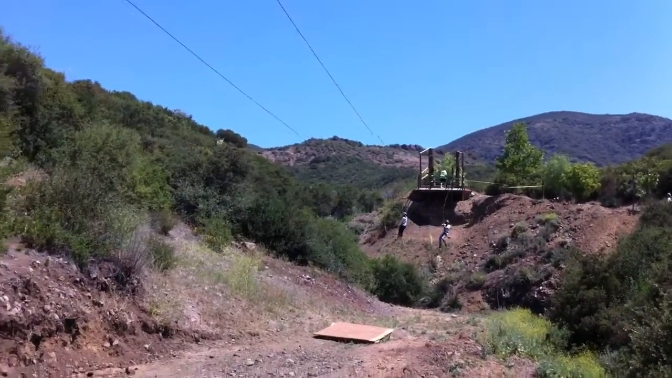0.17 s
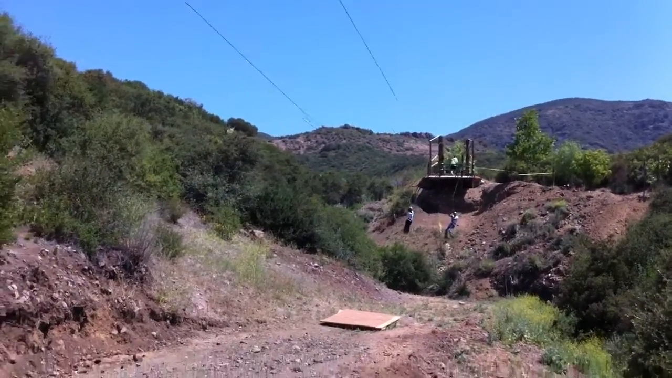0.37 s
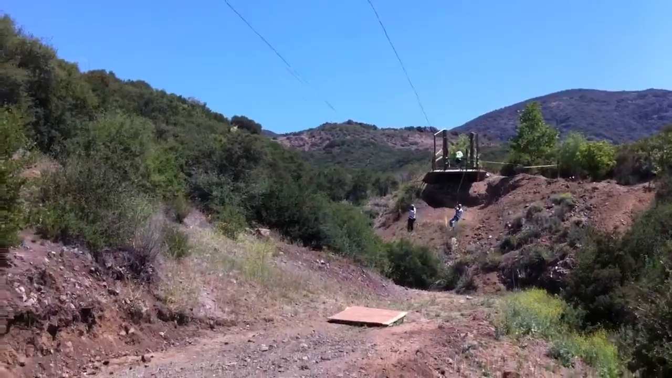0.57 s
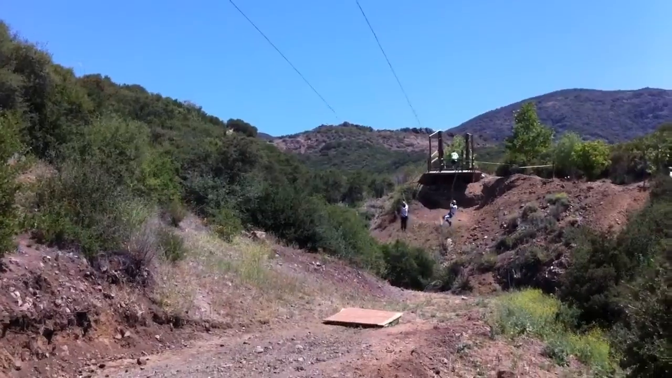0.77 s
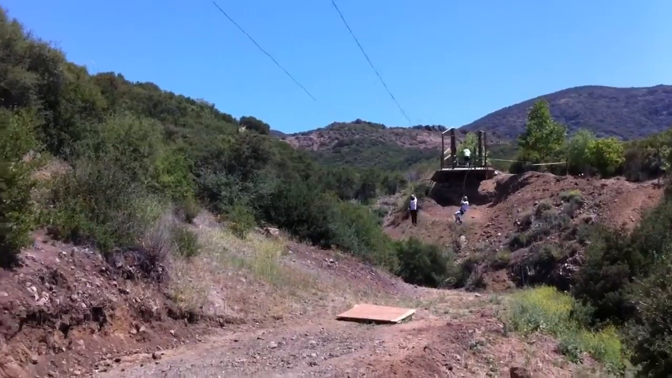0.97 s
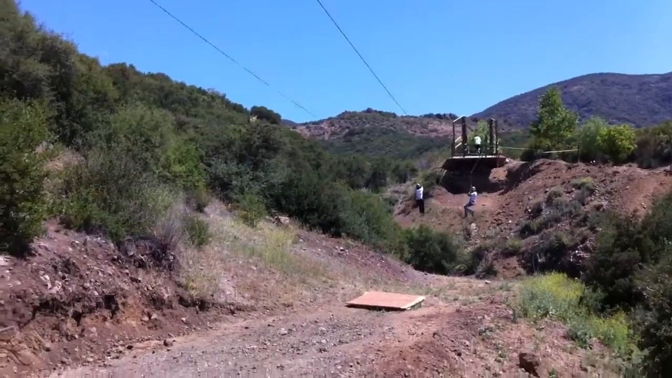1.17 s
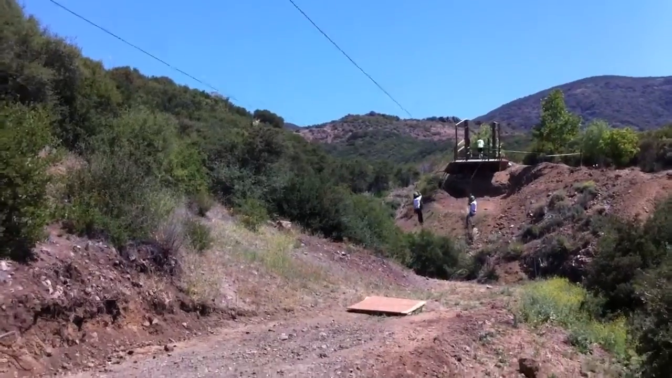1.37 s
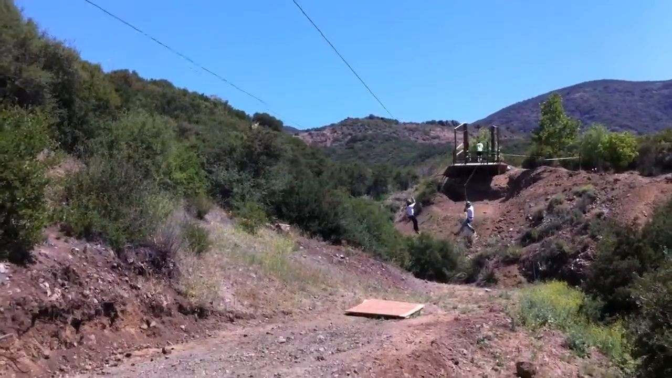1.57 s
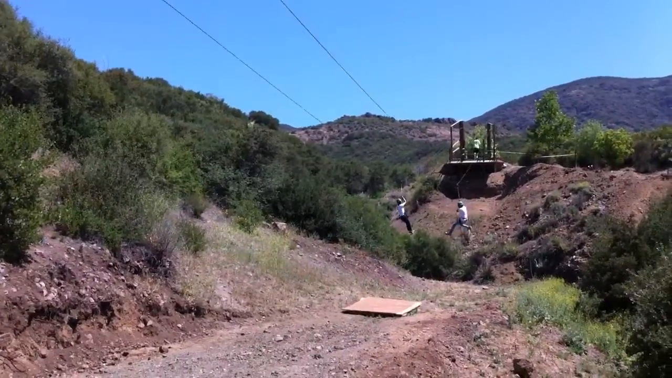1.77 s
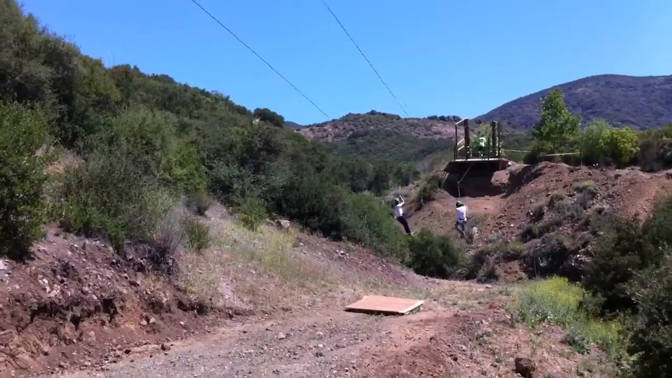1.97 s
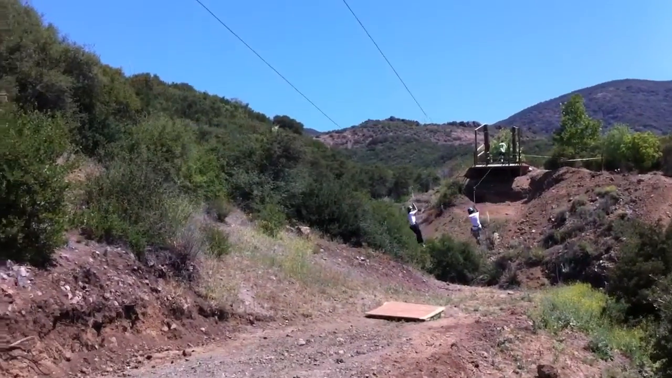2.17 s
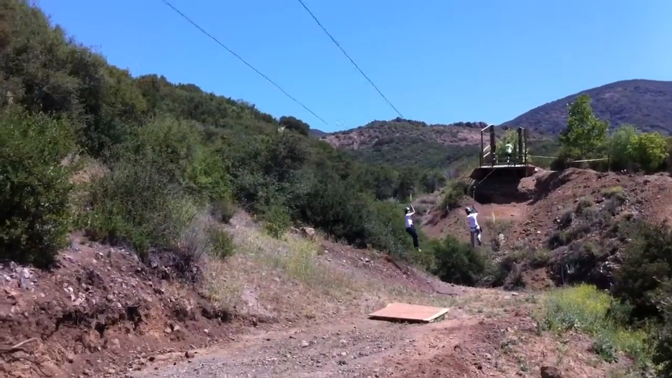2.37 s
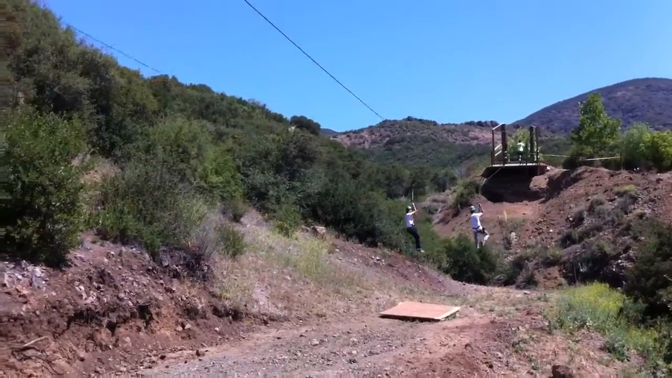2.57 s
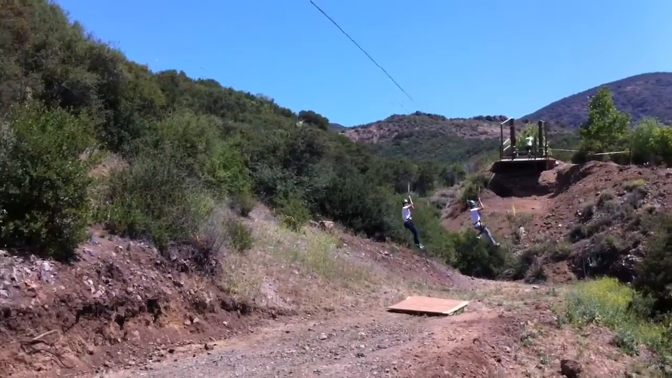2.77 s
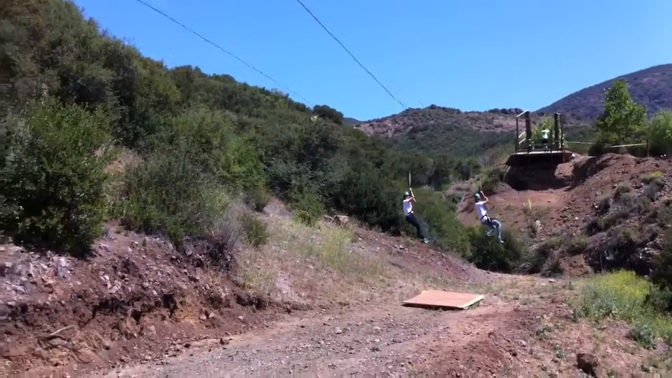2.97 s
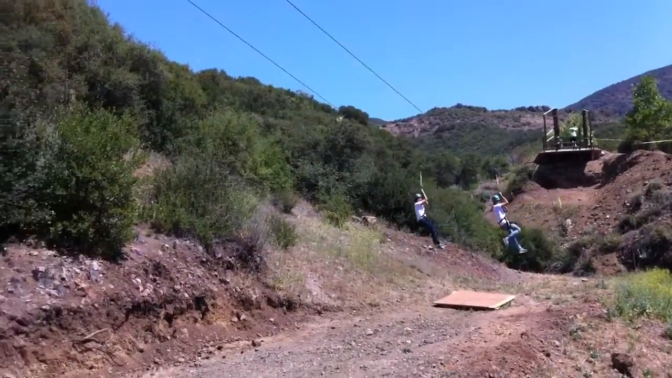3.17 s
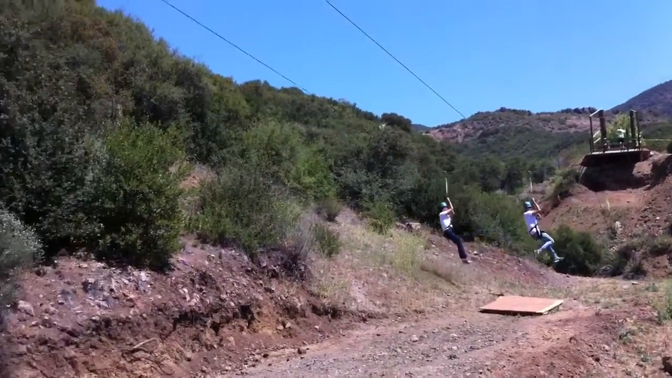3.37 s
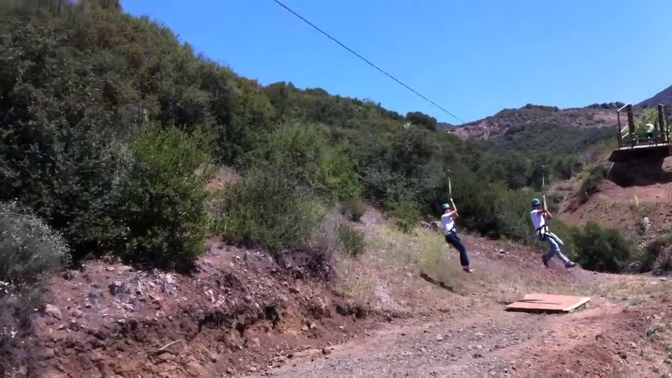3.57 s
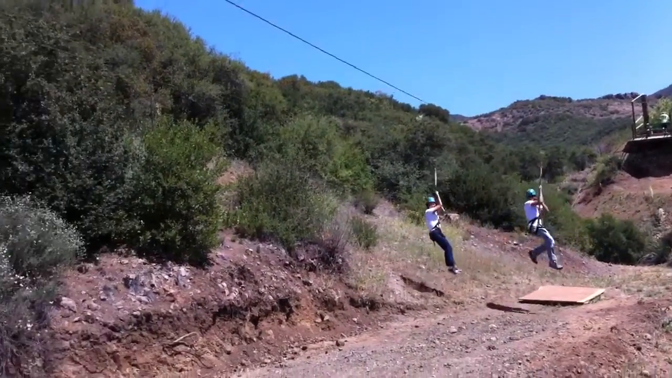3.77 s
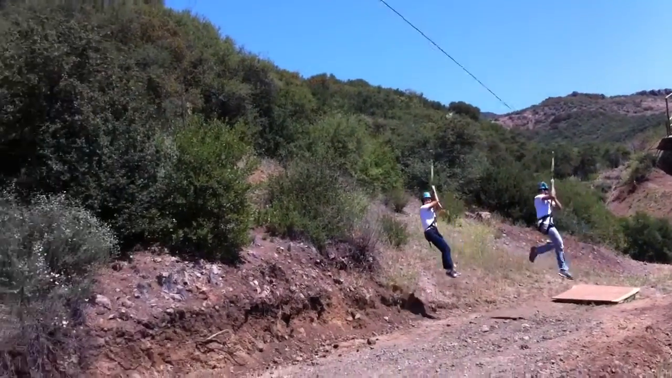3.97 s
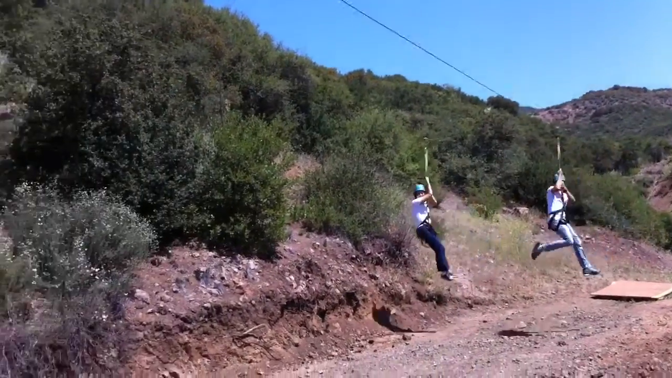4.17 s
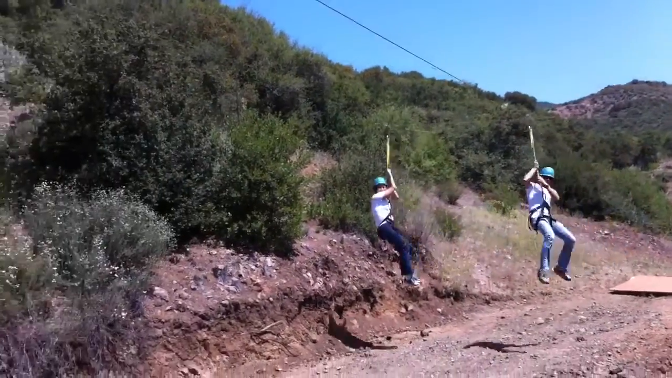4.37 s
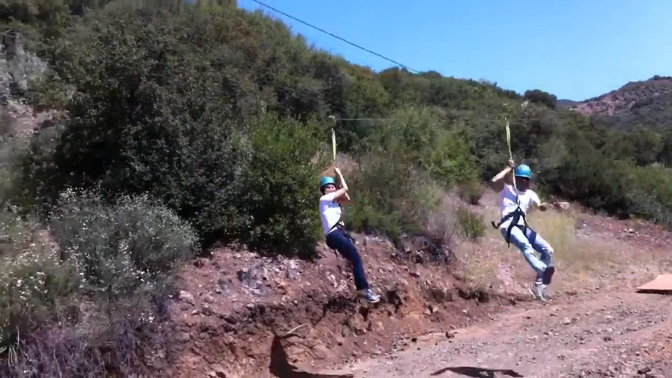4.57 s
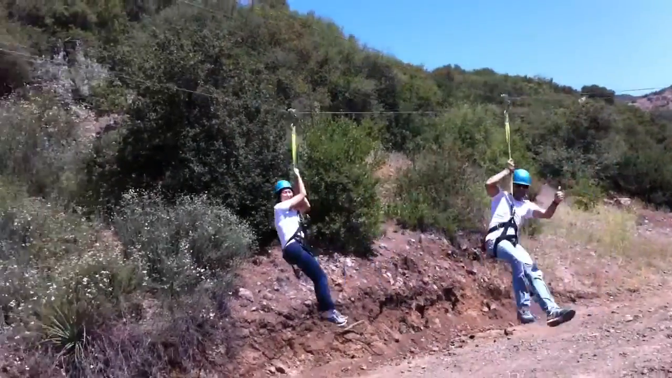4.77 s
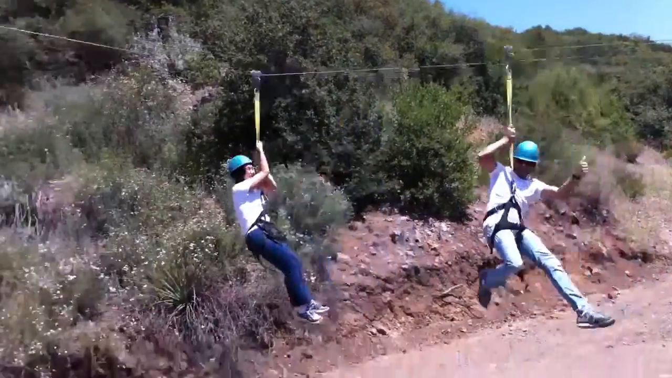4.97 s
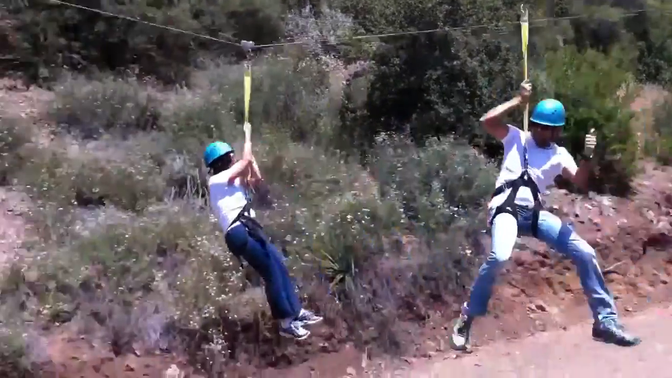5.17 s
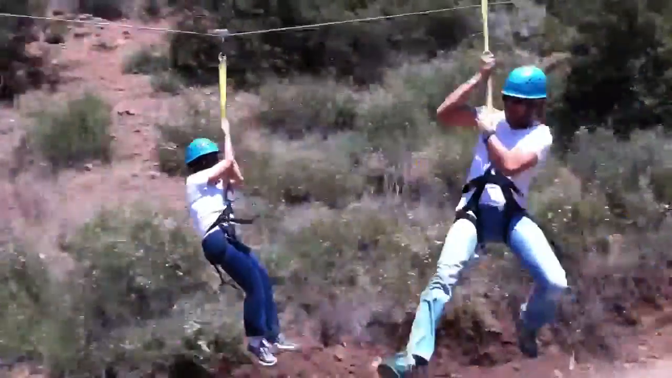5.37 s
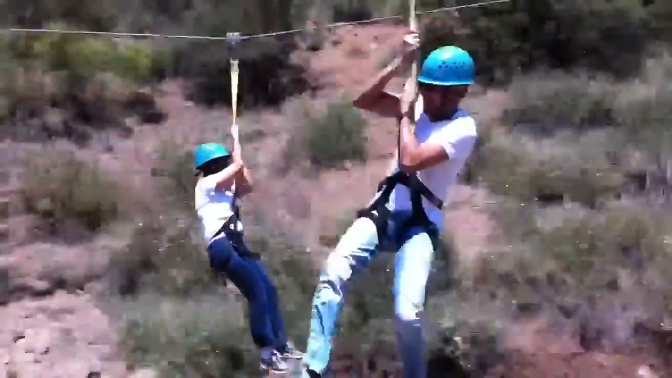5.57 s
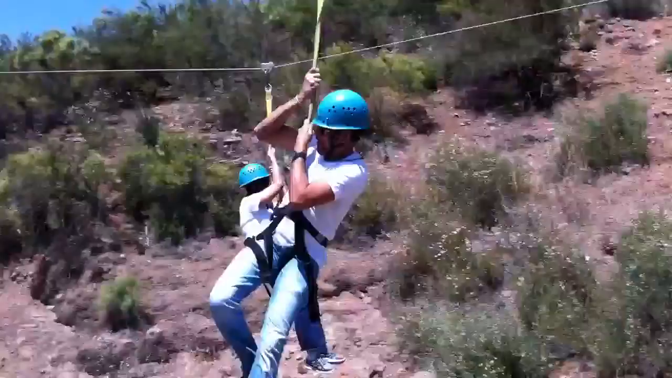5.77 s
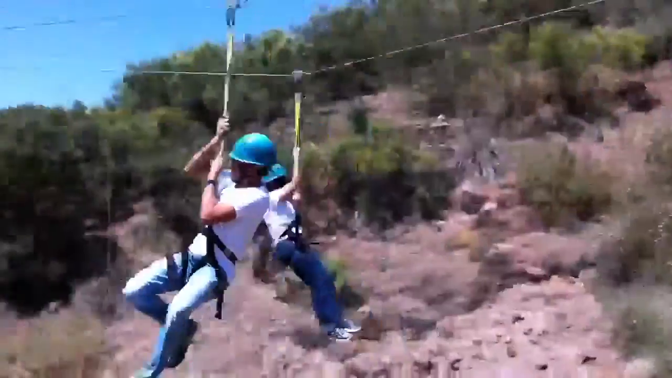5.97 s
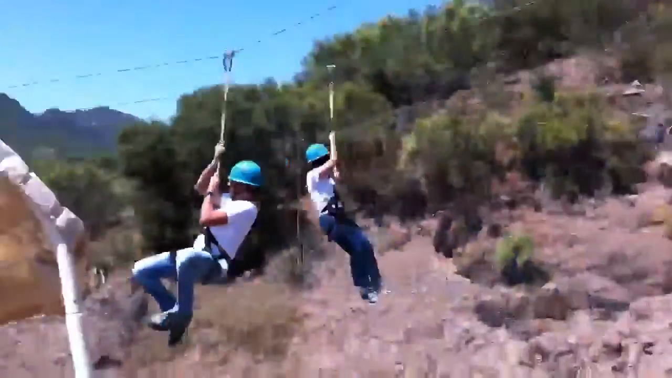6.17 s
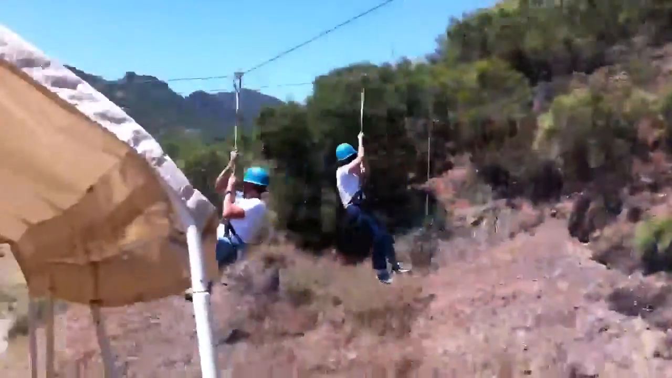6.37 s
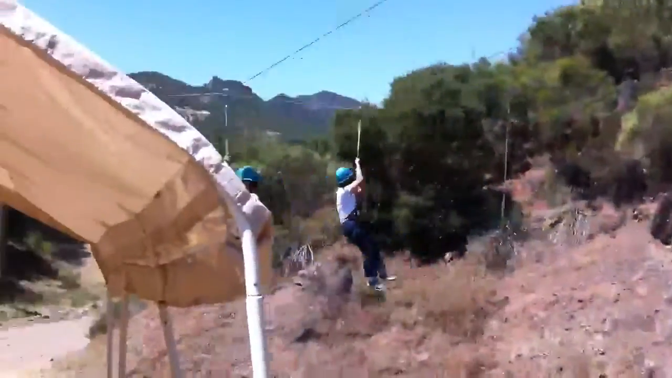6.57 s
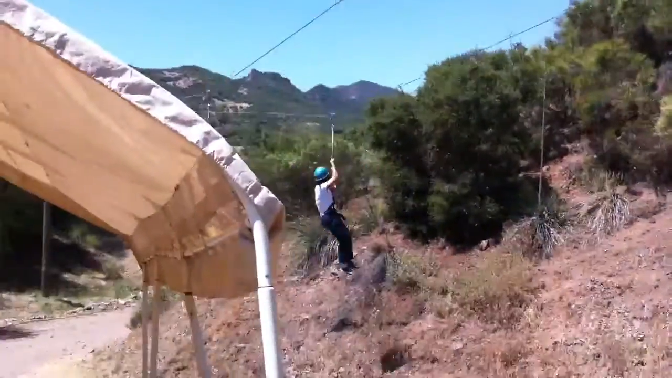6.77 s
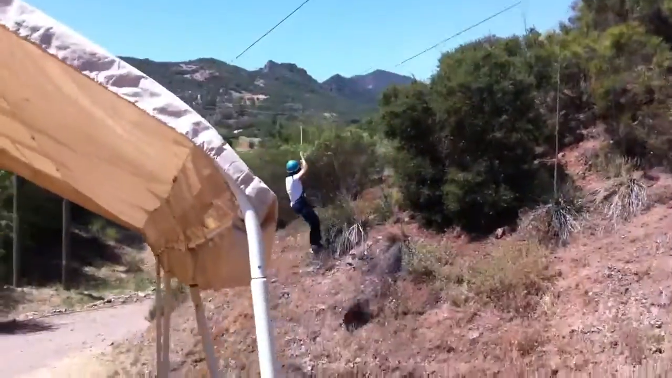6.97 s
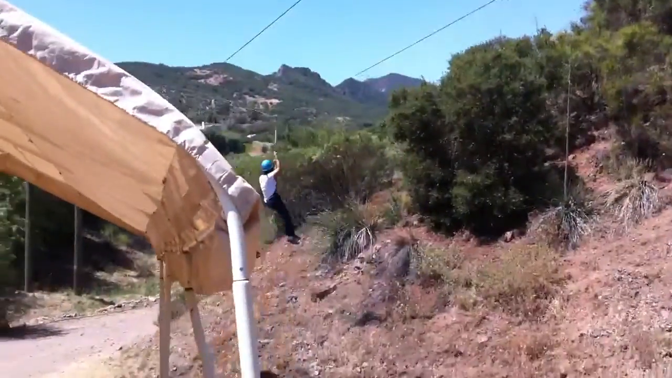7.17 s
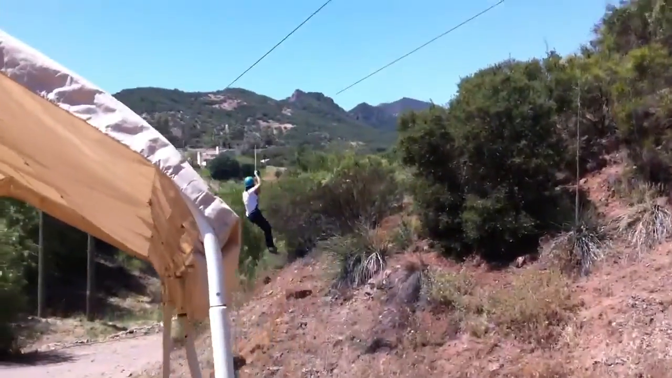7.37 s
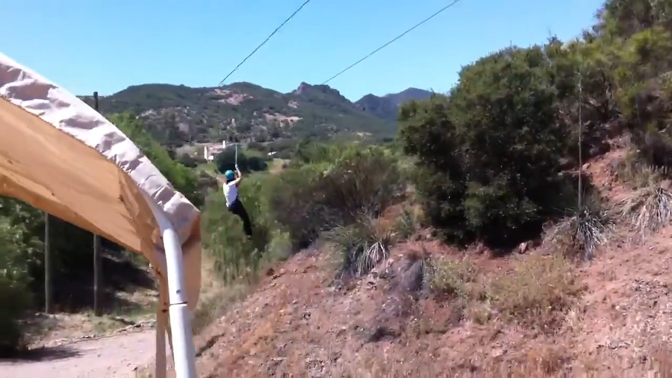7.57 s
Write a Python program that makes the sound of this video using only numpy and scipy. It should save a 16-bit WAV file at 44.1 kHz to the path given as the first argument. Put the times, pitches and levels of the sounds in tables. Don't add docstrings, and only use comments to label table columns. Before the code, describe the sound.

Outdoors in a quiet canyon, a handheld microphone hears two zip line trolleys approaching. From 0 to 3 seconds they are distant: a thin, unsteady hum of wheels over cable strands, drifting upward in pitch, with faint fluctuating hiss and small wind thumps, a sharper one near 1.5. From 3 to 4.5 the rolling hiss grows steadily, grainy and metallic, with a gently wavering hum and soft buffets around 3.8. Near 4.9 to 5.2 heavy wind thuds strike the microphone as the hiss becomes a loud, bright rush. The closest pass lasts from about 5.1 to 6, with ringing steel plates, brief squeaks at 5.5 to 5.9, thin high bearing whistles and another wind thump at 6. After 6.4 the rush falls away, a faint high whistle lingering near 7, until a soft hum, weak hiss and light gusts remain at 7.6.

```python
import sys
import numpy as np
from scipy import signal
from scipy.fft import rfft, irfft, next_fast_len
from scipy.io import wavfile
from scipy.ndimage import uniform_filter1d

SR = 44100
rng = np.random.default_rng(int(sys.argv[2]) if len(sys.argv) > 2 else 0)


def transcribe(u):
    v = np.clip(np.atleast_2d(u).T, -1, 1)
    q = np.round(v * 32767).astype(np.int16)
    wavfile.write(sys.argv[1], SR, q)


def ratio(d):
    e = np.asarray(d, float) / 20
    return 10 ** e


N = 335601
SIZE = next_fast_len(N)
CUTOFF_HZ = 15740

# time_s, strand_rate_hz, hum_db, cable_return_db
NEAR_HUM = [(0.0, 730.6, -53, -51), (0.6, 794, -41, -48.5), (.9, 741, -51.5, -45.5), (1.12, 745, -58, -62),
            (1.3, 885.2, -47.5, -70), (1.5, 796, -46, -44), (1.74, 869.4, -41, -43), (1.97, 764, -44, -48),
            (2.42, 898, -46.5, -41.5), (2.63, 778, -45, -54), (2.78, 904, -45, -42),
            (2.99, 869.5, -39.5, -40), (3.2, 910, -60, -55), (3.55, 890, -46.5, -45.5),
            (4.1, 890.7, -52, -44.5), (4.6, 879.7, -54.5, -44), (5.5, 865, -47, -40),
            (7.61, 889.4, -55, -37.5)]
# time_s, strand_rate_hz, hum_db
FAR_HUM = [(0, 669.5, -55), (1.55, 832, -59), (1.72, 885, -40.5), (1.97, 875, -54), (2.2, 850, -42.5),
           (2.4, 884, -61), (2.7, 927.6, -46), (2.95, 880, -58), (3.4, 920, -46), (3.85, 906, -45.5),
           (4.8, 901, -55.5), (5.81, 969.4, -51), (6.15, 867, -63), (6.47, 842, -42.5), (6.6, 748.6, -53),
           (6.98, 820.6, -42), (7.2, 763, -46.5), (7.61, 800, -62)]
# multiple, level_re_ring_db
OVERTONES = [(2, -20), (3, -18), (4, -17)]
SWAY_HZ, SWAY_PER_S, SWAY_FROM_S = 16, 3.4, 3.0
UNSTEADY = (0.901, 1.2, 1.715, 1.596)

# time_s, face (0 far, 1 front, 2 side, 3 back)
FACING = [(0, 0.), (.95, -0.36), (1.5, 0.97), (4.55, 1.03), (4.9, 1.31), (5.3, 1.58), (5.55, 2.36),
          (5.95, 2), (6.15, 2.5), (6.45, 3), (7.61, 3)]
# time_s, level_db
ROLL = [(0.0, -52), (0.78, -43), (1.17, -53), (1.67, -41), (1.97, -43.5), (2.88, -38), (3.16, -40.5),
        (3.7, -33.5), (3.86, -31.5), (4.5, -29), (5.1, -23), (5.89, -22.5), (5.99, -27), (6.36, -24),
        (6.62, -30.5), (6.87, -29), (7.27, -36), (7.61, -48)]
# freq_hz, far_db_per_hz, front_db_per_hz, side_db_per_hz, back_db_per_hz
HISS = [(980, -6.5, -3, -6, -13.5), (1950, 2, -9.5, -1.5, -4.5), (3660, -6, -1, -5.5, 2),
        (7950, -3.5, 0, -15.5, -4), (11647, -17, 1, 8, -4), (15810, -43, -7, -2, -5.5)]
# centre_hz, width_hz, far_db, front_db, side_db, back_db
PLATES = [(1150, 300, 5.0, -3.0, -10.5, -1.5), (1810, 400, -2.0, 8.0, -3.0, 0.0),
          (2270, 290, 3.5, 3.0, 6.0, 6.5), (2710, 460, 0.5, 6.0, 1.0, 1.5),
          (3430, 310, 5.0, 4.5, 15.5, 6.0), (3820, 300, 2.0, -3.0, -9.0, -7.0),
          (4560, 480, 8.0, 5.0, 9.0, 0.0), (5090, 600, 3.5, 2.0, -2.0, -3.0),
          (6560, 1260, 5.0, 7.0, 11.0, 8.0), (7540, 1000, -6.0, -5.5, 7.5, 4.0),
          (9340, 580, 4.5, 4.5, 3.0, 0.5), (10440, 1000, 2.5, 3.5, 0.5, 4.0),
          (11230, 440, 1.5, 0.0, 5.0, 2.5), (11930, 650, -5.5, -7.0, -5.0, -2.0),
          (12600, 180, 4.0, 3.5, 1.0, 6.0), (12520, 300, -1.0, -0.5, 4.5, 5.0),
          (13200, 600, -0.5, 0.5, 4.0, 4.5), (14460, 410, 2.0, 4.0, 4.5, 1.5)]
# centre_hz, width_hz, far_db, front_db, side_db, back_db
BEARING = (12570, 70, 5, 5, 0, 2)
DOPPLER = (.012, .02, 0, -.02)
# far_db, front_db, side_db, back_db
RING_DB = (-4.5, -6.5, 7, -2)
# far_db, front_db, side_db, back_db
SIZZLE_DB = (-5, -3, 3, -0.7)
RING_LAG, SIZZLE_LEAD, MEAN_ROLL_DB = 0.27, 0.096, -37.5

# time_s, pitch_hz, level_db
GLIDES = [
    [(5.74, 1636, -70), (5.79, 1603, -34), (5.85, 1380, -36), (5.92, 1495, -39), (5.98, 1617, -73)],
    [(5.44, 2480, -70), (5.49, 2525, -34), (5.56, 2680, -43), (5.63, 2450, -25), (5.7, 2450, -37),
     (5.76, 2400, -68)],
    [(7.42, 1233, -83), (7.48, 1180, -47), (7.61, 1204, -54.5)],
]
# start_s, length_s, pitch_hz, level_db
SINGING = [
    (5.45, .17, 11250, -32),
    (5.82, .11, 11250, -31),
    (6.8, .44, 12330, -39),
    (5.12, .28, 2260, -37),
]
SING_EDGE_S, SING_BLUR_HZ = 0.046, 59.96

# freq_hz, density_db_per_hz
CABLE = [(560, -41), (680, -10), (760, -1.5), (900, -4), (980, -18), (1150, -15.5)]
# freq_hz, level_db
RUMBLE = [(150, -21), (300, -0.5), (500, -7), (1000, -18), (1300, -26)]
RUMBLE_RE_HISS_DB = -31.5

# start_s, length_s, level_db
GUSTS = [(0, 0.16, -37), (0.239, .15, -36), (0.442, 0.32, -46), (.95, 0.069, -42), (1.386, .12, -44.5),
         (1.545, 0.045, -44.5), (1.766, .13, -43.5), (1.96, .15, -51.5), (2.29, .06, -55), (2.45, .2, -56),
         (2.64, 0.081, -46.5), (3.202, 0.15, -56), (3.35, 0.15, -42), (3.52, .2, -56.5), (3.74, 0.21, -42),
         (4.12, 0.1, -55), (4.856, 0.27, -30.5), (5.138, 0.065, -19), (5.46, .09, -39.5),
         (5.883, 0.22, -34), (6.129, 0.051, -38), (6.188, 0.33, -46), (6.367, .06, -37.5),
         (6.601, 0.22, -54.5), (6.903, 0.27, -43), (7.23, 0.45, -40.5)]
GUST_RISE_DB_PER_S, GUST_FALL_DB_PER_S, CALM_DB = 800, 750, -65.5
# freq_hz, density_db_per_hz
WIND_SOFT = [(18, -62), (30, -41), (117, 1.5), (178, 2), (293, -12.5), (343, -18), (450, -26), (580, -58),
             (990, -120)]
# freq_hz, density_db_per_hz
WIND_HARD = [(18, -80), (40, -48), (80, -31), (135, 2.5), (190, -1), (480, -4.5), (670, -11), (1050, -24.5),
             (1500, -29), (3000, -70)]
# time_s, peak_db, swing_hz
BUFFETS = [(0.009, -18, 138), (0.295, -21, 182), (0.36, -22, 175), (0.957, -30.5, 147), (1.473, -13.5, 150),
           (1.482, -16, 160), (1.777, -24, 188), (2.316, -36, 188), (3.752, -17.5, 165.2),
           (3.779, -21.5, 210), (3.835, -23, 167), (4.209, -31, 154), (4.856, -20.5, 190),
           (4.923, -10.5, 230), (4.937, 1, 169.2), (4.98, -16.5, 217), (4.992, -17, 200), (5.11, -15, 178),
           (5.149, -4.5, 148), (5.165, -3.5, 151), (5.173, -7.5, 162), (5.185, -5.5, 273),
           (5.197, -13, 200), (5.509, -16.5, 177), (5.976, -9, 169), (6.021, -18, 152), (6.081, -15, 172),
           (7.333, -22, 194.3)]
PUFF_DB, PUFF_LATE_S, PUFF_DB_PER_S = -12, 0.0093, 480

# freq_hz, density_db_per_hz
AIR = [(20, -30), (60, -6), (150, -11.5), (330, -1.5), (600, -2.5), (1100, -1.5), (2000, -14), (5000, -38)]
AIR_DB = -56
# time_s, low_hz, high_hz, level_db
SPLITS = [(0.816, 4200, 5200, -53), (0.819, 13000, 14500, -65), (2.07, 8770, 11100, -50),
          (2.814, 5130, 6300, -49), (4.396, 11740, 13100, -46), (4.464, 13740, 15100, -42),
          (4.674, 5110, 8400, -35), (5.068, 9600, 11100, -31), (5.069, 6250, 7550, -29),
          (5.137, 8200, 11070, -31), (6.555, 4230, 5160, -43), (6.555, 10330, 12400, -38),
          (6.556, 8200, 9710, -42), (7.18, 8400, 11670, -42), (7.319, 7600, 8940, -49),
          (7.343, 13100, 15290, -49)]


def rms_one(x):
    return x / np.sqrt(np.mean(x ** 2) + 1e-20)


def in_time(rows):
    s, *columns = np.transpose(rows)
    return [np.interp(np.arange(N) / SR, s, c) for c in columns]


def at_hz(points, hz):
    table_hz, table_db = np.array(points).T
    return np.interp(np.log(hz + 1), np.log(table_hz), table_db)


def by_face(values):
    return np.interp(in_time(FACING)[0], np.arange(len(values)), values)


def drift(rate_hz):
    pole = np.exp(-80 * np.pi * rate_hz / SR)
    draws = rng.standard_normal(N // 40 + 2002)
    slow = signal.lfilter([1], [1, -2 * pole, pole * pole], draws)[2000:]
    return np.interp(np.arange(N) / 40, np.arange(len(slow)), rms_one(slow))


def coloured(shape_db):
    white = rfft(rng.standard_normal(SIZE))
    return rfft(rms_one(irfft(white * ratio(shape_db), SIZE)))


def noise(points):
    hz = np.fft.rfftfreq(SIZE, 1 / SR)
    return irfft(coloured(at_hz(points, hz)), SIZE)[:N]


def hum(rows, wander_hz, flutter_db, ring_db=None, sway_hz=0):
    hz, level_db = in_time(rows)[:2]
    phase = 2 * np.pi * np.cumsum(hz + sway_hz + wander_hz * drift(24.1)) / SR
    tone = np.sin(phase) * ratio(level_db + flutter_db * drift(30))
    if ring_db is not None:
        loose = phase + 2 * np.pi * np.cumsum(11 * drift(40)) / SR
        for multiple, share_db in OVERTONES:
            tone = tone + np.sin(multiple * loose) * ratio(ring_db + share_db + 4 * drift(8))
    return np.sqrt(2) * tone


def rocking(lead_cycles):
    t = np.arange(N) / SR
    depth_hz = SWAY_HZ * np.clip(t - SWAY_FROM_S, 0, 1) * by_face(UNSTEADY)
    return depth_hz * np.sin(2 * np.pi * (SWAY_PER_S * t + lead_cycles))


def wheels():
    level_db, ring_db, _ = roll_levels()
    loose = by_face(UNSTEADY)
    ring_db = level_db + ring_db
    near = hum(NEAR_HUM, 8. * loose, 3.63 * np.sqrt(loose), ring_db, rocking(.1))
    far = hum(FAR_HUM, 8.71 * loose, 2.5 * loose, ring_db, .5 * rocking(0.599))
    return near + far


def roll_levels():
    level_db, = in_time(ROLL)
    excess_db = level_db - MEAN_ROLL_DB
    ring_db = by_face(RING_DB) - RING_LAG * excess_db
    sizzle_db = by_face(SIZZLE_DB) + SIZZLE_LEAD * excess_db
    return level_db, ring_db, sizzle_db


def face_colour(face, hz):
    still_hz = hz / (1 + DOPPLER[face])
    lift_db = 0
    for row in [*PLATES, BEARING]:
        offset = 1.43 * (still_hz - row[0]) / row[1]
        lift_db = lift_db + row[2 + face] / (1 + offset ** 2)
    smooth_db = at_hz([(row[0], row[1 + face]) for row in HISS], hz)
    return smooth_db + 1.174 * lift_db


def rolling_hiss():
    level_db, ring_db, sizzle_db = roll_levels()
    facing, = in_time(FACING)
    hz = np.fft.rfftfreq(SIZE, 1 / SR)
    faces = []
    for face in range(len(DOPPLER)):
        share = np.sqrt(np.clip(1 - abs(facing - face), 0, 1))
        faces.append((coloured(face_colour(face, hz)), share))
    # low_hz, high_hz, level_re_hiss_db, band count
    groups = [(950, 3720, ring_db, 5), (3720, 8700, 0, 4), (8700, CUTOFF_HZ, sizzle_db, 5)]
    out, together = 0, drift(14.0) + 0.85 * drift(17)
    for low_hz, high_hz, rel_db, count in groups:
        edges = np.geomspace(low_hz, high_hz, count + 1)
        flickers = [ratio(0.35 * together + 1.0 * drift(11.2)) for _ in range(count)]
        for spectrum, share in faces:
            bands = [irfft(spectrum * ((hz >= a) & (hz < b)), SIZE)[:N] for a, b in zip(edges, edges[1:])]
            scale = np.sqrt(sum(np.mean(band ** 2) for band in bands))
            flickering = sum(f * band for f, band in zip(flickers, bands))
            out = out + share * ratio(rel_db) / scale * flickering
    grit = ratio(0.34 * drift(200))
    return ratio(level_db) * grit * out


def swing(x, depth_db):
    _, _, z = signal.stft(x, SR, nperseg=1024)
    field = rng.standard_normal(z.shape)
    for axis, size in [(0, 3), (0, 2), (1, 14), (1, 9)]:
        field = uniform_filter1d(field, size=size, axis=axis)
    return signal.istft(z * ratio(depth_db * rms_one(field)), SR, nperseg=1024)[1][:N]


def gliding_tones():
    return sum(hum(rows, 8.14, 1.2) for rows in GLIDES)


def singing():
    out = 0
    for s, length_s, hz, level_db in SINGING:
        end = s + length_s
        rows = [(s - SING_EDGE_S, hz, level_db - 35), (s, hz, level_db),
                (end, hz, level_db), (end + SING_EDGE_S, hz, level_db - 36)]
        out = out + hum(rows, SING_BLUR_HZ, 4.4)
    return out


def cable_return():
    return ratio(in_time(NEAR_HUM)[2] + 3.7 * drift(3.1)) * noise(CABLE)


def frame_rumble():
    return ratio(in_time(ROLL)[0] + RUMBLE_RE_HISS_DB) * noise(RUMBLE)


def gust_level():
    t = np.arange(0, N, 40) / SR
    s, length_s, level_db = np.transpose(GUSTS)[:, :, None]
    rise_db = GUST_RISE_DB_PER_S * np.maximum(s - t, 0)
    fall_db = GUST_FALL_DB_PER_S * np.maximum(t - s - length_s, 0)
    gusts_db = level_db - (rise_db + fall_db)
    at_s, peak_db, _ = np.transpose(BUFFETS)[:, :, None]
    puffs_db = peak_db + PUFF_DB - PUFF_DB_PER_S * abs(t - at_s - PUFF_LATE_S)
    strongest_db = np.maximum(np.vstack([gusts_db, puffs_db]).max(axis=0), CALM_DB)
    return np.interp(np.arange(N) / SR, t, strongest_db)


def wind():
    gust_db = gust_level()
    hard = np.clip((gust_db + 36) / 24, 0, 1) ** 1.5
    lumps = rms_one(ratio(3.94 * drift(30.5)))
    eddies = np.sqrt(1 - hard) * noise(WIND_SOFT) + np.sqrt(hard) * noise(WIND_HARD)
    steady_db = np.minimum(gust_db - 5 * hard, -21)
    port = signal.butter(2, 70, "high", fs=SR, output="sos")
    return signal.sosfilt(port, ratio(steady_db + 0.5) * lumps * eddies)


def buffets():
    out, t = np.zeros(N + SR), np.arange(SR // 10) / SR
    for s, peak_db, hz in BUFFETS:
        cycles = t * hz * (1 + 0.033 * max(peak_db + 20, 0))
        envelope = cycles / .7 * np.exp(1 - cycles / .7)
        push = np.sin(2 * np.pi * 1.5 * cycles ** .75) * envelope
        start = round(s * SR)
        out[start:start + len(t)] += ratio(peak_db - 6.5) * push
    leaky_port = signal.butter(2, 110, "high", fs=SR, output="sos")
    return signal.sosfilt(leaky_port, out[:N])


def canyon_air():
    return ratio(AIR_DB) * noise(AIR)


def scene():
    trolleys = wheels() + gliding_tones() + singing() + cable_return()
    trolleys = trolleys + swing(rolling_hiss(), depth_db=2.3) * ratio(-.6) + frame_rumble()
    mono = trolleys + wind() + buffets() + canyon_air()
    return np.array([mono, mono])


def starve(x, under_db):
    hz, _, z = signal.stft(x, SR, nperseg=1024)
    power = uniform_filter1d(abs(z) ** 2, size=2, axis=1)
    near = uniform_filter1d(power, size=4, axis=0)
    around = uniform_filter1d(power, size=40, axis=0)
    bar = [(2500, under_db - 5), (4500, under_db - 3.5), (7500, under_db), (12000, under_db + 1.7)]
    bar_db = at_hz(bar, hz)[:, None]
    dropped = (near < around * ratio(2 * bar_db)) & (hz[:, None] > 2500)
    return signal.istft(z * np.where(dropped, .05, 1), SR, nperseg=1024)[1][:N]


def splits():
    out, fade = np.zeros(N), np.sin(np.pi * np.arange(2048) / 2048)
    hz = np.fft.rfftfreq(len(fade), 1 / SR)
    for s, low_hz, high_hz, level_db in SPLITS:
        white = rfft(rng.standard_normal(len(fade)))
        band = irfft(white * ((hz > low_hz) & (hz < high_hz)))
        start = round(s * SR) - len(fade) // 2
        out[start:start + len(fade)] += ratio(level_db) * fade * rms_one(band)
    return out


def band_limit(x):
    return signal.sosfilt(signal.butter(12, 16020, fs=SR, output="sos"), x)


def record(dry):
    rounded = .9 * np.tanh(dry[0] / .9)
    top_cut = signal.ellip(14, .3, 75, CUTOFF_HZ, fs=SR, output="sos")
    mid = starve(signal.sosfilt(top_cut, rounded), under_db=-8)
    side = splits()
    return band_limit(np.array([mid + side, mid - side]))


dry = scene()
out = record(dry)
transcribe(out)
```